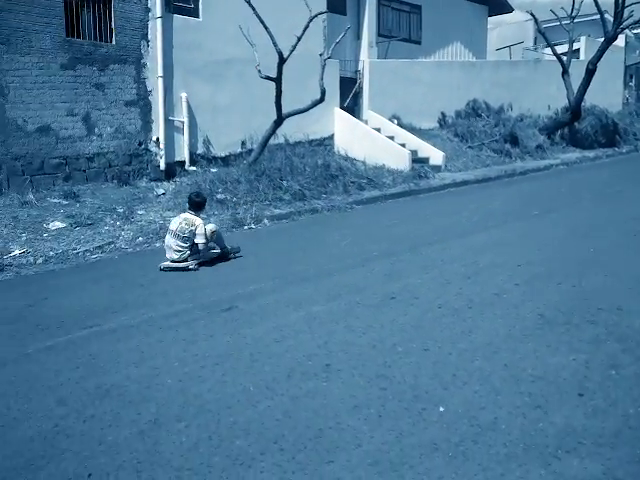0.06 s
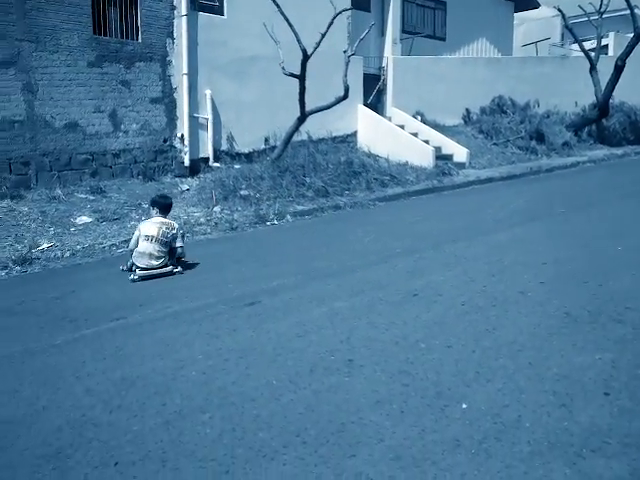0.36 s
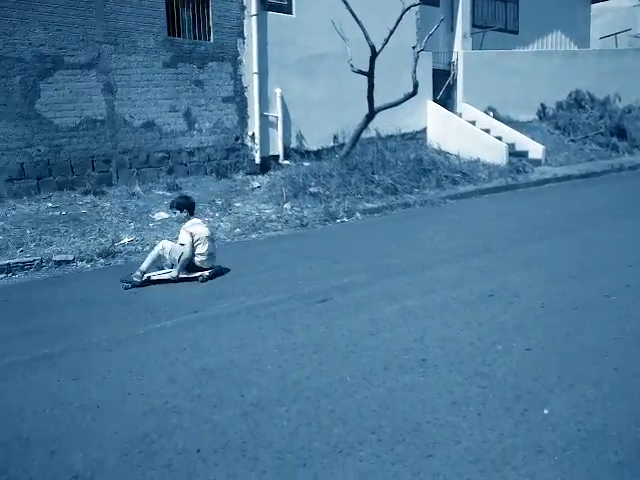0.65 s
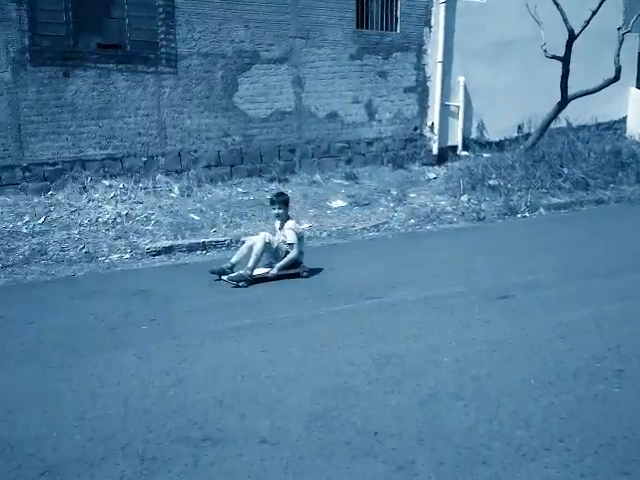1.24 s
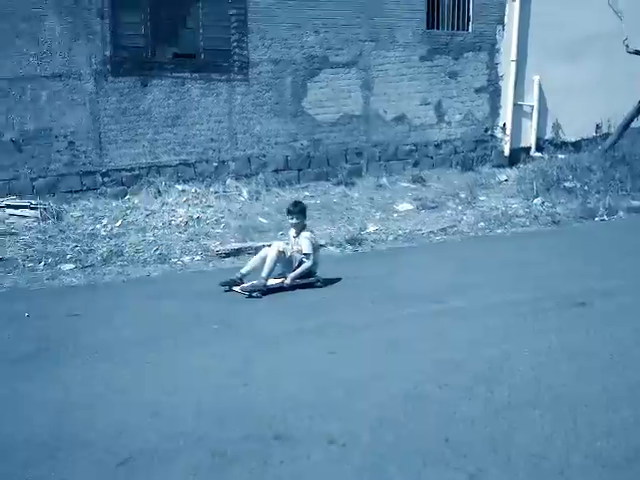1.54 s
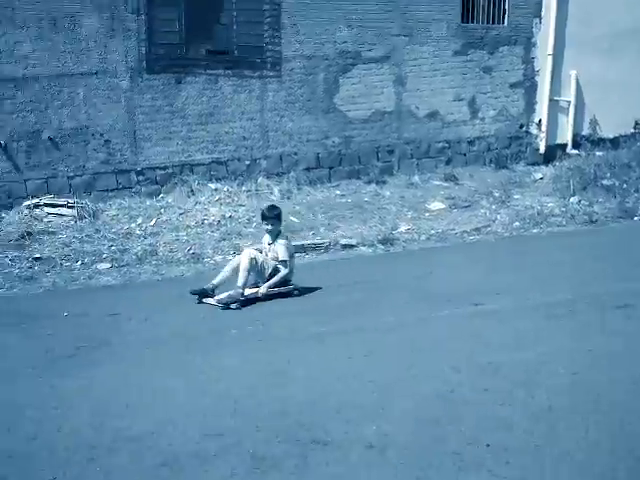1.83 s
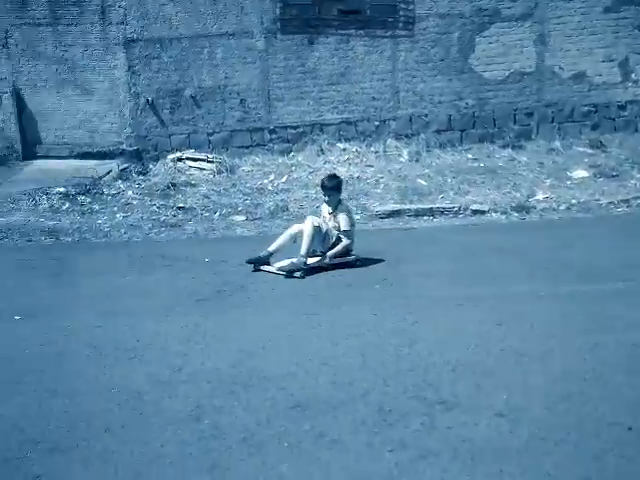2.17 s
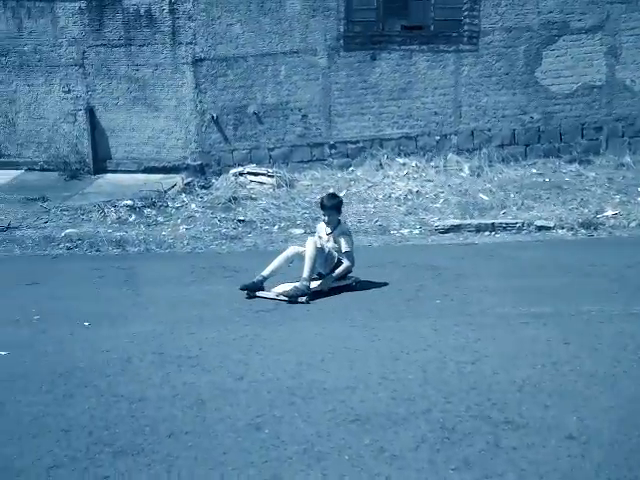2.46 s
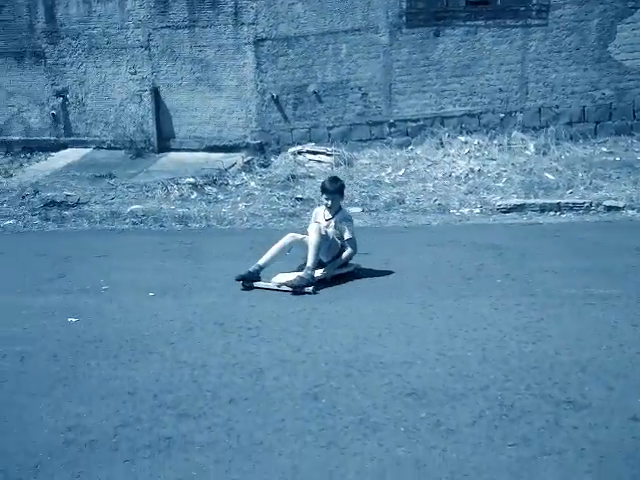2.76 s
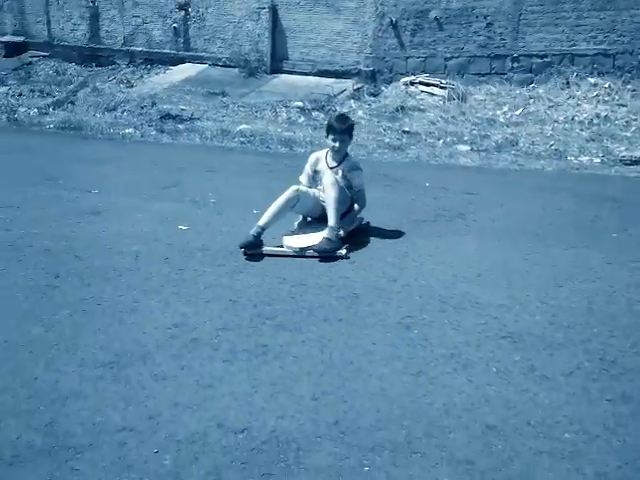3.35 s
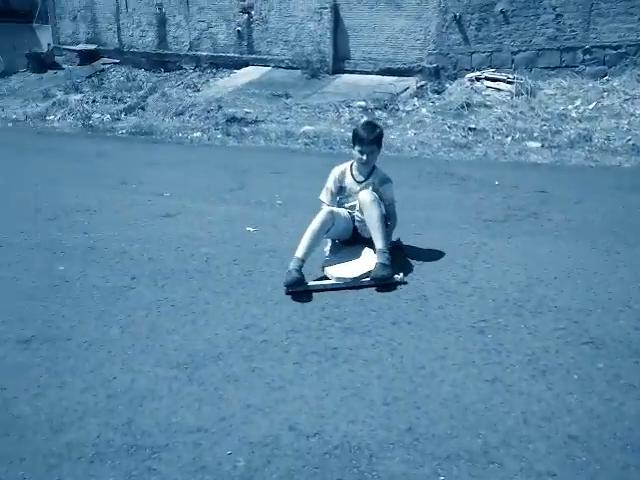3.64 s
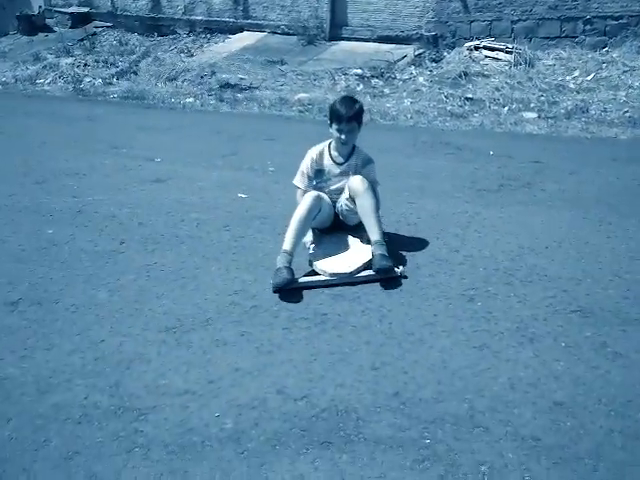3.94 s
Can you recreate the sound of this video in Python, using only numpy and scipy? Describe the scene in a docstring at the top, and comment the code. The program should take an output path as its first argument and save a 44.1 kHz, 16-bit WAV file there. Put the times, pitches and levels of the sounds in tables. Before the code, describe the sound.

Hard cart wheels skid and scrape on asphalt, then roll closer over grit.

```python
"""Hard wheels judder and scrape as a small home-made cart skids round on an asphalt slope.
It almost stalls, then rolls closer and gathers speed. Asphalt grain shakes the board and rings
the wheels; the rims catch and slip, fine grit sizzles and ticks, stones knock.
House walls echo faintly. Two microphones hear the cart with different colour and phase."""
import sys
import numpy as np
from scipy import signal
from scipy.fft import rfft, irfft, next_fast_len
from scipy.io import wavfile
from scipy.ndimage import uniform_filter1d

SR = 44100
rng = np.random.default_rng(int(sys.argv[2]) if len(sys.argv) > 2 else 0)


def materialize(psi):
    """Save the field psi as 16-bit PCM at rate SR to the path in sys.argv[1].

    A 1-D psi becomes a single channel; in a 2-D psi each row is a channel.
    """
    bounded = np.clip(np.atleast_2d(psi).T, -1, 1)
    quanta = np.round(bounded * 32767).astype(np.int16)
    wavfile.write(sys.argv[1], SR, quanta)


N = 176400

# Layer envelopes: t/s, relative level/dB
BOARD_ENV = [(0, -42.5), (0.32, -38), (0.52, -40.5), (0.68, -47.5), (1.1, -50.5), (1.85, -42), (2.5, -38),
             (4, -42.5)]
JUDDER_ENV = [(0, -26.5), (0.11, -28.5), (0.18, -19), (0.26, -24), (0.35, -21.3), (0.62, -25.5), (0.8, -34)]
SCRAPE_ENV = [(0, -22.5), (0.08, -20), (0.28, -26), (0.78, -27.5), (0.84, -36), (0.98, -30.5), (1.04, -41),
              (1.35, -37.5), (1.85, -29), (2.35, -27.5), (2.98, -24), (3.5, -32.5), (4, -32.5)]
RASP_ENV = [(0, -27), (0.63, -23.5), (0.78, -31), (0.96, -32), (1.03, -44), (1.33, -39), (1.95, -31),
            (2.25, -25.5), (3.1, -25), (3.55, -33), (4, -32)]
RATTLE_ENV = [(0, -41.5), (.6, -37), (1.05, -54), (1.3, -45), (1.85, -39.5), (2.25, -43), (2.6, -56)]
SIZZLE_ENV = [(0, -30.5), (0.42, -30), (0.48, -26.5), (0.62, -27.5), (0.68, -32.5), (1.1, -48.5),
              (1.24, -46), (1.8, -39.5), (1.86, -35.5), (2, -38.5), (2.22, -32.5), (2.62, -30.5),
              (2.75, -33), (3.26, -31), (3.29, -26), (3.38, -31.5), (3.9, -33), (4, -37)]
CHATTER_ENV = [(.5, -39.5), (.8, -32.5), (.93, -28.5), (1.02, -54)]
WHEEL_ENV = [(0.75, -28.5), (0.87, -42), (1.25, -39), (2.05, -31), (2.16, -26), (2.28, -30.5), (3, -28),
             (3.45, -22.8), (4, -21.5)]
# Layer spectra, ahead of any glide: f/Hz, relative level/dB
BOARD_SPECTRUM = [(40, -38), (110, -13.5), (150, -16.5), (220, 0), (330, -1.5), (420, 3), (520, -3.5),
                  (1500, -42.5)]
JUDDER_SPECTRUM = [(200, -40.5), (340, -22.5), (430, -7), (510, -10), (640, 1), (760, -7), (950, -15),
                   (1190, -14.5), (1600, -36.5)]
SIDEWAYS_SPECTRUM = [(500, -17.5), (970, -11.5), (1070, -1), (1180, -4), (1350, 4.5), (1600, -4),
                     (2050, -1.5), (2300, -8.5), (3200, -30.5)]
STRAIGHT_SPECTRUM = [(500, -23), (900, -7), (1080, -2.5), (1220, -4.5), (1412, 2.5), (1600, -1), (1830, -6),
                     (2140, 4), (2350, -4), (3200, -37), (6000, -51)]
RASP_SPECTRUM = [(1500, -35), (2400, -3.5), (2700, 1), (3100, -6.5), (3500, -2), (4300, -13.5), (5100, -27),
                 (9000, -44)]
SIZZLE_SPECTRUM = [(3000, -37), (5200, -5), (6500, -8.5), (8300, 1), (11000, 1), (13700, -3)]
KNOCK_SPECTRUM = [(200, -39), (700, -12.5), (1450, -10.5), (2600, 0.5), (6000, -31), (14000, -21)]
# Rim and wheel resonances: f/Hz, width/Hz, relative level/dB
RIM_RESONANCES = [(4720, 210, -0.5), (9100, 620, 0.5), (12930, 380, -1.5)]
WHEEL_RESONANCES = [(417, 38, -16), (670.4, 62.3, -0.5), (756.5, 78.5, -1.5), (839.4, 54, -1),
                    (1417, 54, -13)]
# Stones under a wheel: t/s, crack peak/dB, ring re crack/dB, rattle decay/s
STONE_HITS = [(.476, -12, -4, .008), (1.313, -15, -12, .005), (1.400, -17, -8, .001),
              (1.543, -19, -4, .018), (1.733, -19, -1, .004), (1.753, -16, -2, .005),
              (2.377, -10, -14, .002), (2.531, -.5, -20, .001), (2.542, -7, -18, .003),
              (2.630, -6, -16, .002), (2.857, -9, -14, .002), (2.921, -6, -16, .002),
              (2.977, -6, -12, .001), (3.405, -10.5, -2, .003), (3.610, -19, 0, .003)]
# Grit cracking under a rim: t/s, peak/dB, f/Hz
GRIT_CRACKS = [(3.226, -15.5, 4100), (3.404, -17, 13000), (3.578, -15, 10600), (3.587, -17, 13000),
               (3.609, -17.5, 13000), (3.708, -14, 12400), (3.728, -18, 12000), (3.911, -21, 12800)]
# Left microphone re right: f/Hz, level/dB, phase lead/rad
MIC_BALANCE = [(150, 1.5, 2), (357, 7, 1.16), (497, 9.5, 2.2), (520, 15.5, 0.5), (600, 4, -0.7),
               (880, 5, 0.4), (975, 11, 0.33), (1140, 3.5, 1.5), (1597, -.5, -0.9), (1843, -6, 1.6),
               (1990, 3, -1.5), (2190, -14, 0.2), (2434, -4.5, -4.5), (2890, -4, -4), (3822, 0.5, -3.5),
               (5780, -0.5, 2), (8320, 0, -3), (14070, -1, -15.5)]

GRIP_S, STRAIGHTEN_S = (0.63, 0.83), (1, 1.75)  # crossfades: slide to roll, sideways to straight
HOPS_S = (1.722, 3.391, 3.595)
TIME_S = np.arange(N) / SR


def undb(db):
    return 10 ** (np.asarray(db) / 20)


def unit_rms(x):
    return x / np.sqrt(np.mean(x ** 2))


def envelope(rows, gain_db=0):
    return undb(np.interp(TIME_S, *np.array(rows).T) + gain_db)


def over_hz(rows, size, column=1):
    """Table column at the FFT bins, interpolated in log frequency."""
    rows = np.array(rows, float)
    bins_hz = np.maximum(np.fft.rfftfreq(size, 1 / SR), 1)
    return np.interp(np.log(bins_hz), np.log(rows[:, 0]), rows[:, column])


def colour(x, spectrum, size=2048):
    """Minimum-phase filter."""
    cepstrum = irfft(np.log(undb(over_hz(spectrum, size))))
    cepstrum[1:size // 2] *= 2
    cepstrum[size // 2 + 1:] = 0
    return signal.fftconvolve(x, irfft(np.exp(rfft(cepstrum))))[:N]


def ring(x, hz, width_hz):
    return signal.lfilter(*signal.iirpeak(hz, hz / width_hz, SR), x)


def glide(x, span_s, rise):
    """Raise pitch by the fraction `rise` over the span."""
    step = 1 + rise * np.interp(TIME_S, span_s, (0, 1))
    return np.interp(np.cumsum(step), np.arange(N), x, period=N)


def wander(hz):
    """Smooth random drift, rms 1."""
    hold = int(SR / hz)
    steps = np.repeat(rng.standard_normal(N)[:N // hold + 1], hold)[:N]
    return unit_rms(uniform_filter1d(steps, hold))


def grains(rate_hz, spread_db):
    """Tiny random contacts of unequal strength."""
    hit = rng.random(N) < rate_hz / SR
    strength = undb(spread_db * np.clip(rng.standard_normal(N), -2, 2))
    return unit_rms(hit * strength * rng.choice([-1, 1], N))


def jolts(rate_hz, decay_s, depth):
    """Contact force: jumps at each stone, then relaxes."""
    hits = (rng.random(N) < rate_hz / SR) * rng.uniform(0.18, 1, N)
    return 1 + depth * signal.lfilter([1], [1, -np.exp(-1 / (decay_s * SR))], hits)


def wheel_throb(ref_s=3.672, turn_hz=9.7, accel_hz_per_s=1.32, depth_db=1.5):
    """One load swing per turn, deeper with speed; turn_hz and depth_db hold at ref_s."""
    since_s = TIME_S - ref_s
    turns = turn_hz * since_s + .5 * accel_hz_per_s * since_s ** 2
    speed = 1 + accel_hz_per_s * since_s / turn_hz
    return undb(-depth_db * speed ** 4 * np.cos(2 * np.pi * turns))


def board_rumble(road, throb):
    """Asphalt grain shakes the board."""
    shaking = grains(rate_hz=2500, spread_db=3.4) * road ** 0.29 * throb
    return unit_rms(colour(shaking, BOARD_SPECTRUM)) * envelope(BOARD_ENV, gain_db=3.5)


def skid_judder():
    """Sliding wheels judder, rising in pitch as they come into line."""
    judder = unit_rms(colour(grains(rate_hz=4000, spread_db=2), JUDDER_SPECTRUM))
    return glide(judder, span_s=(.45, .78), rise=.19) * envelope(JUDDER_ENV, gain_db=1)


def rim_scrape(force):
    """Rims catch and slip on stones, first sideways, then running straight."""
    straight = np.interp(TIME_S, STRAIGHTEN_S, (0, 1))
    slips = grains(rate_hz=5000, spread_db=2.9) * force
    scrape = unit_rms(colour(slips, SIDEWAYS_SPECTRUM)) * np.sqrt(1 - straight)
    scrape += unit_rms(colour(slips, STRAIGHT_SPECTRUM)) * np.sqrt(straight)
    return scrape * envelope(SCRAPE_ENV, gain_db=-.5)


def rim_rasp(force):
    """Upper band of the rim slip; pitch rises along the ride."""
    rasp = colour(grains(rate_hz=5000, spread_db=3.2), RASP_SPECTRUM)
    rising = glide(rasp, span_s=(.6, 3.9), rise=.1)
    return unit_rms(rising * force) * envelope(RASP_ENV, gain_db=-.5)


def rim_rattle(taps, force, hz=4300, width_hz=1850):
    """Taps on the rims: a thin metallic rattle in the skid and slow roll."""
    rattle = ring(ring(taps * force, hz, width_hz), hz, width_hz)
    return unit_rms(rattle) * envelope(RATTLE_ENV)


def grit_sizzle(road, throb, shared_power=0.33, ping_db=-7):
    """Fine grit hisses and pings on the rims; left and right partly correlated."""
    spurts = road ** 1.14 * throb ** 1.3 * jolts(rate_hz=140, decay_s=0.0025, depth=.75)

    def grit():
        pings = 0
        for hz, width_hz, db in RIM_RESONANCES:
            strikes = grains(rate_hz=450, spread_db=1.4) * undb(6.2 * wander(hz=25))
            pings += undb(db) * ring(strikes, hz, width_hz)
        hiss = colour(grains(rate_hz=16000, spread_db=5.6) * spurts, SIZZLE_SPECTRUM)
        return unit_rms(hiss) + undb(ping_db) * unit_rms(pings)
    common = np.sqrt(shared_power) * grit()
    pair = np.array([common + np.sqrt(1 - shared_power) * grit() for _ in range(2)])
    return pair * envelope(SIZZLE_ENV, gain_db=.5)


def wheel_ring(push):
    """Short-lived wheel resonances, alternating in sign."""
    return sum((-1) ** k * undb(db) * ring(push, hz, width_hz)
               for k, (hz, width_hz, db) in enumerate(WHEEL_RESONANCES))


def stone_knocks(bounce_s=.0014, bounce_db=-4):
    """A wheel hits a larger stone: crack, quick bounce, rattle, short ring."""
    out = np.zeros(N)
    for start_s, db, ring_db, decay_s in STONE_HITS:
        decay = (TIME_S >= start_s) * np.exp(-np.abs(TIME_S - start_s) / decay_s)
        push = 0.19 * rng.standard_normal(N) * decay
        push[int(start_s * SR)] += 1
        push[int((start_s + bounce_s) * SR)] += undb(bounce_db)
        crack, body = colour(push, KNOCK_SPECTRUM), wheel_ring(push)
        out += undb(db) * (crack / np.abs(crack).max() + undb(ring_db) * body / np.abs(body).max())
    return out


def rim_chatter(taps, force, start_hz=2750, width_hz=560):
    """One rim chatters, rising in pitch as the slide ends."""
    chatter = ring(ring(taps, start_hz, width_hz), start_hz, width_hz)
    rising = glide(chatter, span_s=(.76, .94), rise=.12)
    return unit_rms(rising * force) * envelope(CHATTER_ENV)


def wheel_roll(road, throb, load):
    """Asphalt grain rings the rolling wheels."""
    push = grains(rate_hz=6000, spread_db=3.6) * np.sqrt(road * throb) * load
    return unit_rms(wheel_ring(push)) * envelope(WHEEL_ENV, gain_db=1)


def hop_load(dip_db=-10, half_width_s=0.0094):
    """Wheel load dips as the cart lifts off a bump."""
    return undb(dip_db * sum(np.exp(-((TIME_S - at_s) / half_width_s) ** 2) for at_s in HOPS_S))


def grit_ticks(decay_s=.002):
    """Single bits of grit crack in short bright bursts."""
    out = np.zeros(N)
    for start_s, db, hz in GRIT_CRACKS:
        decay = (TIME_S >= start_s) * np.exp(-np.abs(TIME_S - start_s) / decay_s) + 1e-12
        burst = ring(rng.standard_normal(N) * decay, hz, width_hz=hz * .15)
        out += undb(db) * burst / np.abs(burst).max()
    return out


def wall_echo(x, gain_db=-12, lag_s=.021, growth_s_per_s=.004):
    """One echo per side, later as the cart leaves the house walls."""
    left_s = lag_s + growth_s_per_s * TIME_S
    echoes = [np.interp(TIME_S - delay_s, TIME_S, x, left=0) for delay_s in (left_s, 1.4 * left_s)]
    return undb(gain_db) * np.array(echoes)


def microphones(pair):
    """Left/right level and phase offsets at constant total power."""
    size = next_fast_len(N + SR // 10, real=True)
    ratio = undb(over_hz(MIC_BALANCE, size, column=1))
    lead_rad = over_hz(MIC_BALANCE, size, column=2)
    response = np.array([ratio * np.exp(.5j * lead_rad), np.exp(-.5j * lead_rad)])
    response *= np.sqrt(2 / (1 + ratio ** 2))
    return irfft(rfft(pair, size) * response, size)[:, :N]


def scene():
    """One road surface and one wheel throb modulate rolling, scraping and sizzle."""
    road = undb(1 * wander(hz=150.2) + 0.87 * wander(hz=45.26))  # bumps + patches
    throb, load = wheel_throb(), hop_load()
    grip = np.interp(TIME_S, GRIP_S, (0, 1))
    cart = board_rumble(road, throb) + skid_judder() * np.sqrt(1 - grip)
    cart += wheel_roll(road, throb, load) * np.sqrt(grip)
    rim_force = road * throb * np.sqrt(load) * jolts(rate_hz=160, decay_s=0.0024, depth=1.25)
    cart += rim_scrape(rim_force) + rim_rasp(rim_force)
    taps = grains(rate_hz=1600, spread_db=3.1)
    cart += rim_rattle(taps, rim_force) + rim_chatter(taps, rim_force)
    direct = cart + stone_knocks() + grit_ticks() + grit_sizzle(road, throb)
    return microphones(direct) + wall_echo(cart)


def record(dry):
    """Cut deep bass and top treble."""
    low_hz, top_hz = 165, 13700
    highpass = signal.butter(2, low_hz, "high", fs=SR, output="sos")
    lowpass = signal.ellip(10, .2, 70, top_hz, fs=SR, output="sos")
    return signal.sosfilt(lowpass, signal.sosfilt(highpass, dry))


dry = scene()
out = record(dry)
materialize(out)
```